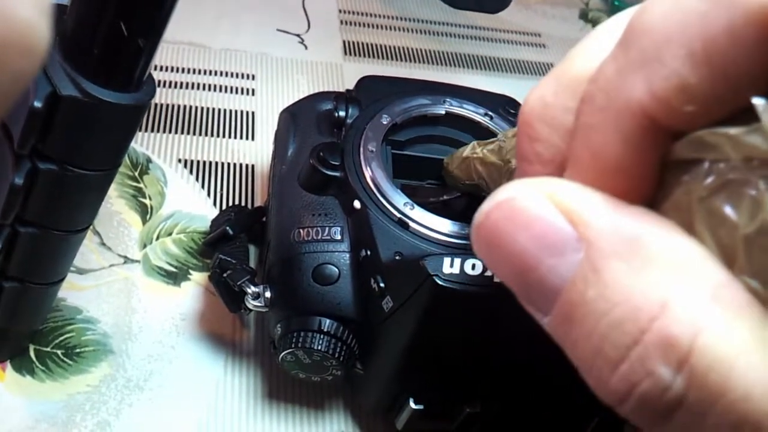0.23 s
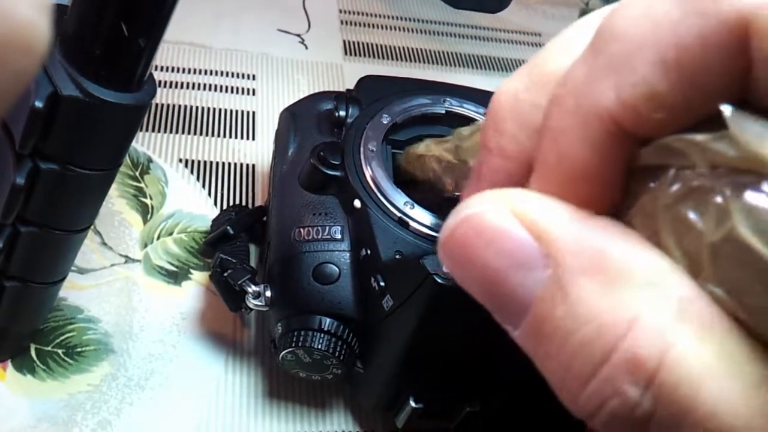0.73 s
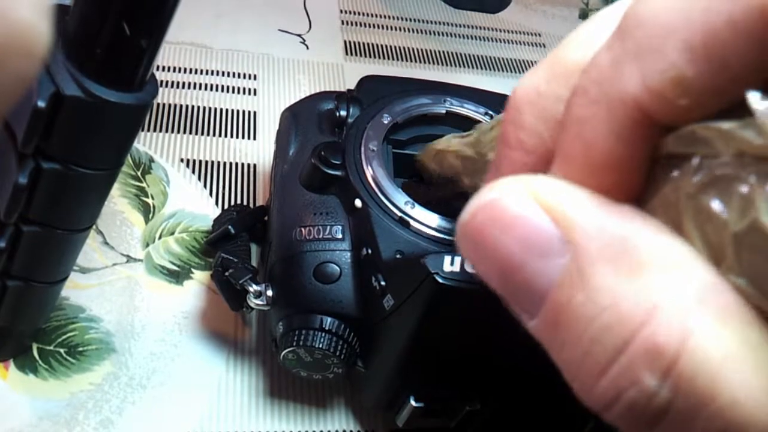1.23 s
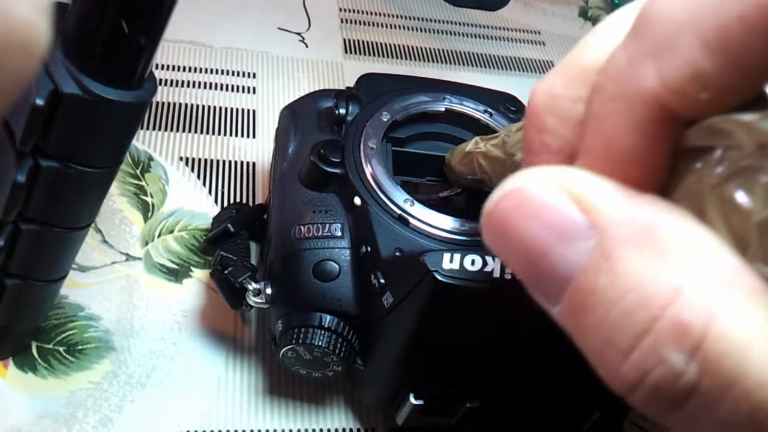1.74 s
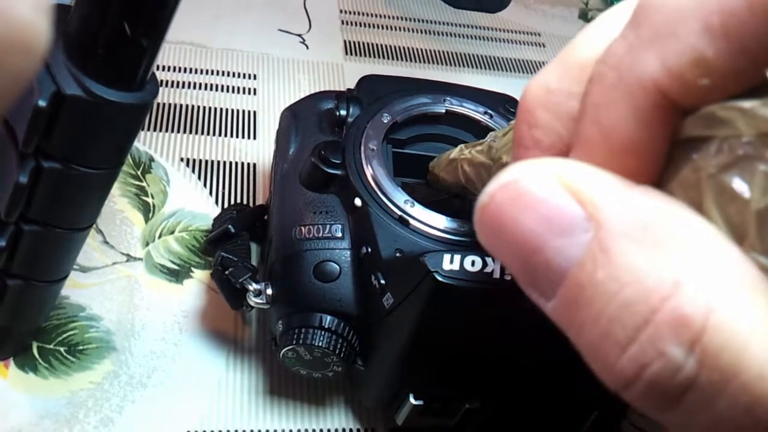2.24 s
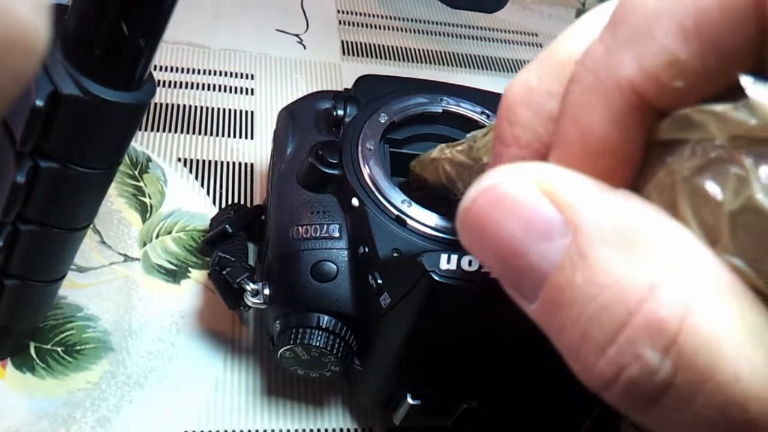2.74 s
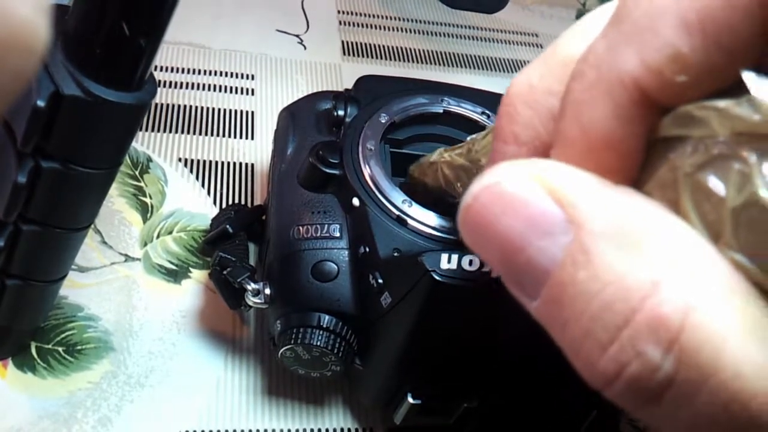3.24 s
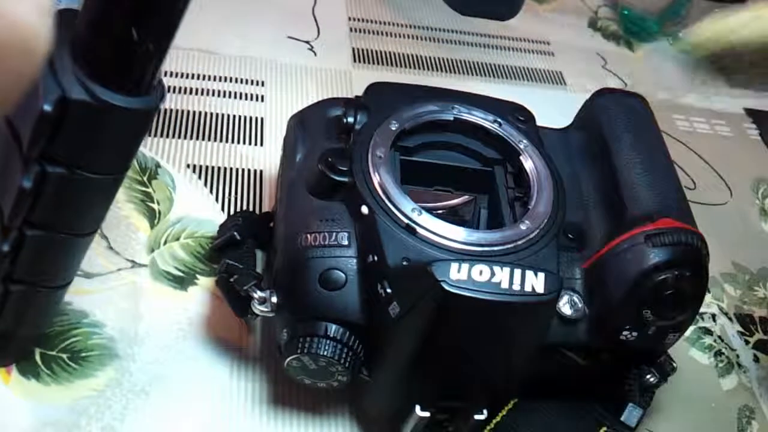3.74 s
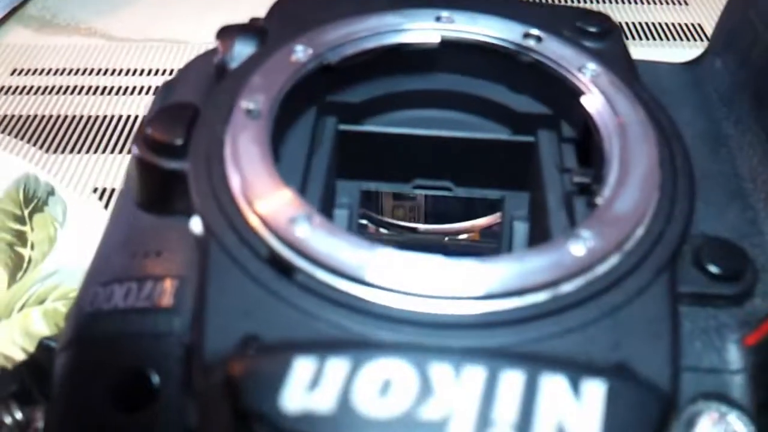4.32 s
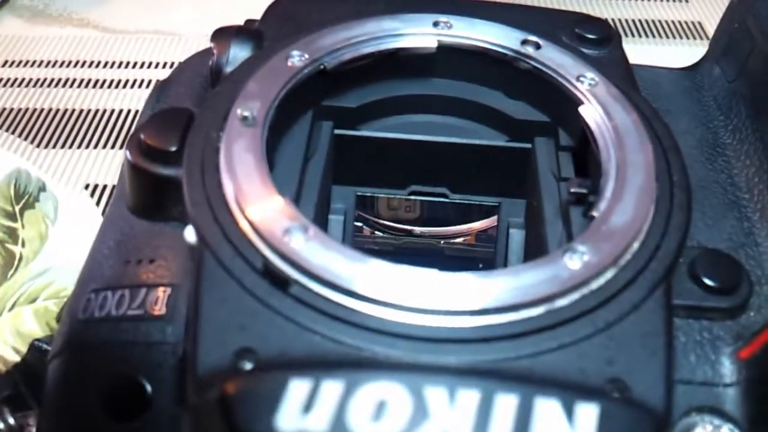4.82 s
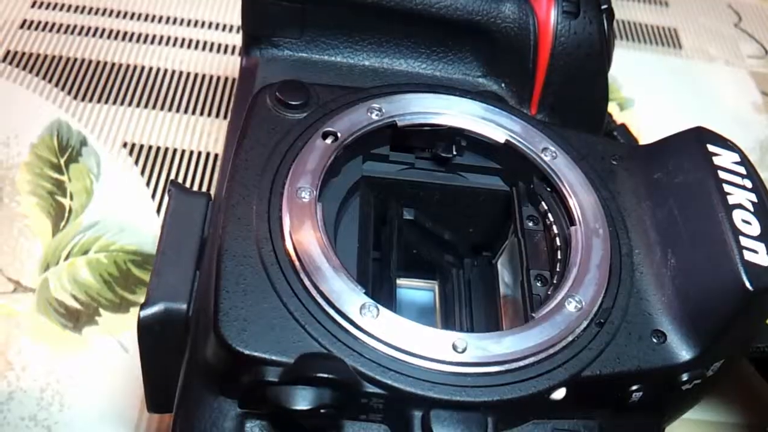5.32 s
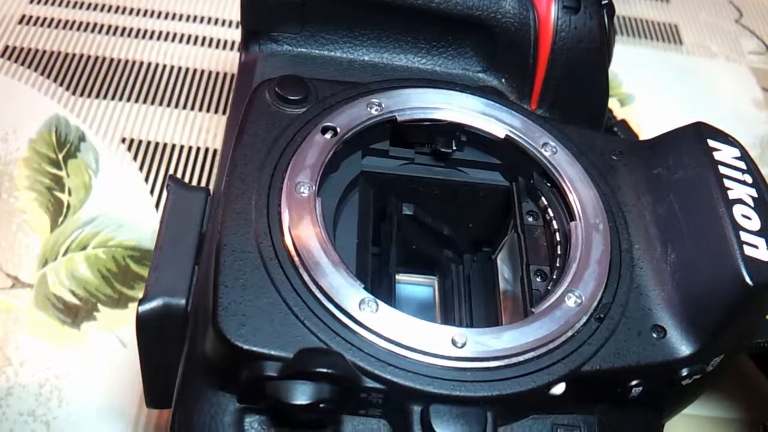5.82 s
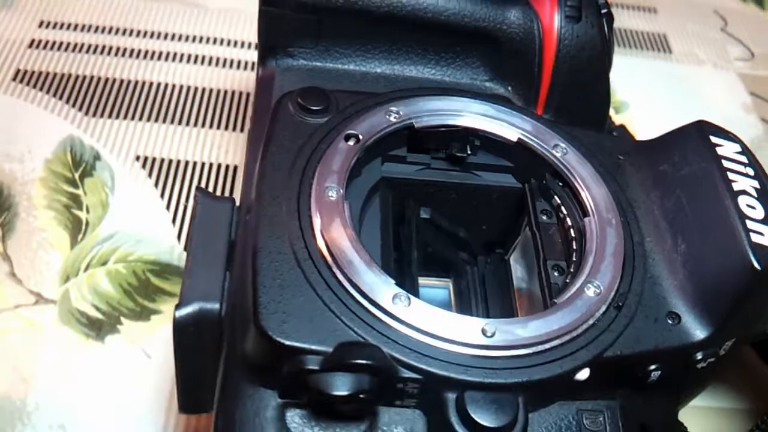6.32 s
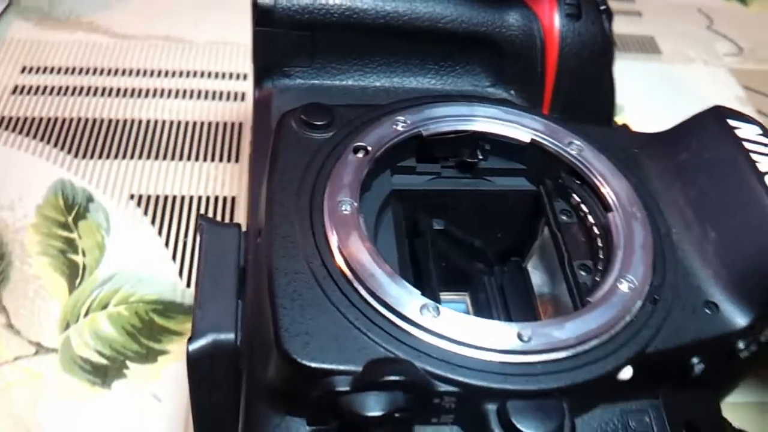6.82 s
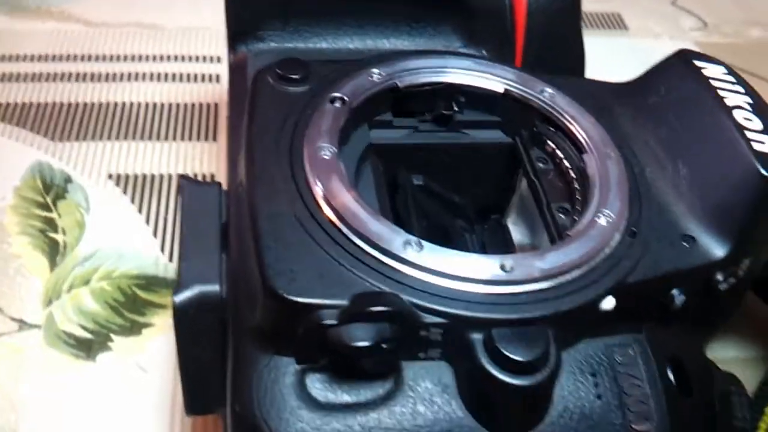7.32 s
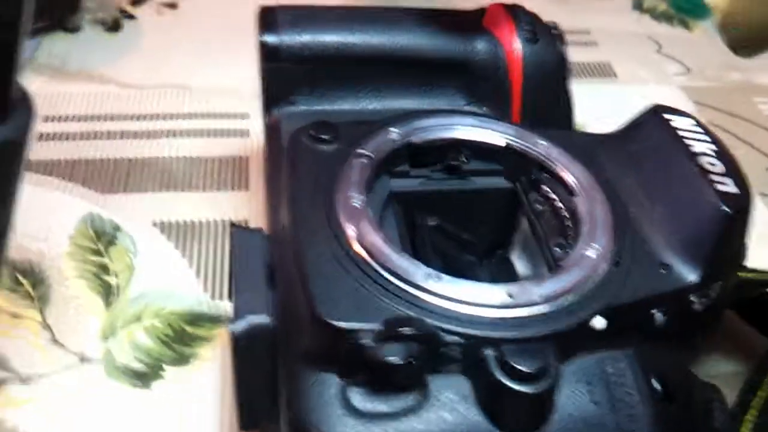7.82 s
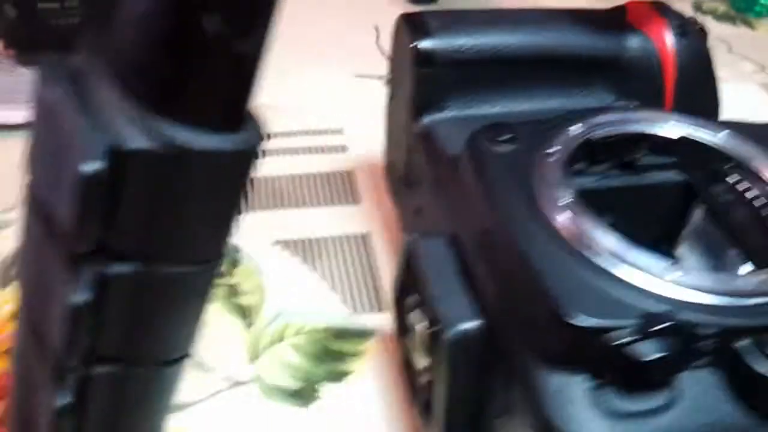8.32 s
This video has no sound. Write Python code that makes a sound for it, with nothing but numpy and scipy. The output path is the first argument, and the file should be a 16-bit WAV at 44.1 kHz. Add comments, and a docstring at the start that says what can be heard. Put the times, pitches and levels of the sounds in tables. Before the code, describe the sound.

Continuous vacuum suction in a small room, in three abrupt sections: first a quiet, restless hiss with whistly resonances and one soft low puff; then a loud, dense roar of air with a clearer motor hum and whine; finally a quieter hiss again, recoloured by short reflections around a moving microphone. Dull, flattened mono sound with limited treble, no pauses.

```python
"""A vacuum cleaner sucks dust from a camera body through a narrow taped nozzle; its motor hums throughout.
First the nozzle probes the lens mount: shaped noise hisses and the resonances of the cavity rise and fall. A
hard cut leads to an open rush, made of steadier noise through the nozzle's own resonances; the whole passage,
motor hum included, plays far louder. After a second hard cut the microphone wanders: moving resonances and
short echoes recolour the hiss. A mono 16 kHz recorder flattens the peaks and mirrors a little hiss above its
band."""
import sys
import numpy as np
from scipy import signal
from scipy.fft import rfft, irfft, next_fast_len
from scipy.io import wavfile
from scipy.ndimage import uniform_filter1d, map_coordinates

SR = 44100
rng = np.random.default_rng(int(sys.argv[2]) if len(sys.argv) > 2 else 0)


def generate_wav(sig):
    """Save sig (samples, or channels by samples) to the path in sys.argv[1] as 16-bit PCM at SR."""
    pcm = np.round(np.clip(np.atleast_2d(sig).T, -1, 1) * 32767).astype(np.int16)
    wavfile.write(sys.argv[1], SR, pcm)


N = 377937
TIME_S = np.arange(N) / SR
CUT_IN_S, CUT_OUT_S = 3.7903, 5.0812  # the open rush lies between these cuts


def amp(db):
    """Turn decibels into gain."""
    return 10 ** (np.asarray(db) / 20)


def unit(x):
    """Scale to rms 1."""
    return x / np.sqrt(np.mean(x ** 2) + 1e-20)


def along(points, hz):
    """Join (Hz, value) points with lines on a log frequency axis."""
    point_hz, value = np.transpose(points)
    return np.interp(np.log(hz + 1), np.log(point_hz + 1), value)


def curves(rows):
    """Give one value per sample for each column after the time in seconds."""
    seconds, *columns = np.transpose(rows)
    return [np.interp(TIME_S, seconds, column) for column in columns]


def wobble(rate):
    """A smooth random curve through rate random knots a second."""
    knots = rng.standard_normal(int(N * rate / SR) + 4)
    return map_coordinates(knots, [TIME_S * rate])


def filtered(x, response):
    """Multiply the spectrum of x by a response of frequency in Hz."""
    size = next_fast_len(N + SR // 2)
    spectrum = rfft(x, size) * response(np.fft.rfftfreq(size, 1 / SR))
    return irfft(spectrum, size)[:N]


def bell(f, hz, width):
    """A resonance curve, 1 at its centre and half as high half a width away."""
    return 1 / (1 + (2 * (f - hz) / width) ** 2)


def by_shot(first, second, third):
    """Cut from each shot to the next within a millisecond."""
    before, after = TIME_S < CUT_IN_S, TIME_S >= CUT_OUT_S
    shots = np.array([before, ~before & ~after, after], float)
    a, b, c = uniform_filter1d(shots, size=44, axis=1)
    return a * first + b * second + c * third


def turbulence(patchy_db):
    """White noise whose strength varies in random patches of time and frequency."""
    z = signal.stft(rng.standard_normal(N), nperseg=512)[2]
    patches = uniform_filter1d(rng.standard_normal(z.shape), size=5, axis=0)
    patches = uniform_filter1d(patches, size=22, axis=1)
    return signal.istft(z * amp(patchy_db * unit(patches)), nperseg=512)[1][:N]


def room(x, wet_db, t60=0.23):
    """Reflections from the walls, a decaying noise tail, ripple the spectrum of a steady sound."""
    t = np.arange(SR // 3) / SR
    tail = rng.standard_normal(len(t)) * amp(-60 * t / t60)
    return x + amp(wet_db) * signal.fftconvolve(x, tail / np.linalg.norm(tail))[:N]


def lift(levels, hiss_db, trim_db):
    """How far a mode with its own level curve stands above the broad hiss, in dB."""
    return curves(levels)[0] - hiss_db + trim_db


def jet(spectrum, modes, level_db, lifts_db, echoes, patchy_db):
    """Nozzle hiss: turbulence coloured by changing resonances and by echoes (ms, strength) close by."""
    f, frame_s, z = signal.stft(turbulence(patchy_db), SR, nperseg=512)
    f = f[:, None]

    def per_frame(control):
        return np.interp(frame_s, TIME_S, control * np.ones(N))

    db = along(spectrum, f) + per_frame(level_db)
    for (hz, width), lift_db in zip(modes, lifts_db):
        db = db + per_frame(lift_db) * bell(f, hz, width)
    # an echo adds and cancels in turn along the spectrum: a hollow, pipe-like colour
    comb = 1
    for delay_ms, strength in echoes:
        comb = comb + per_frame(strength) * np.exp(-2j * np.pi * f * per_frame(delay_ms) / 1000)
    return signal.istft(z * amp(db) * np.abs(comb), nperseg=512)[1][:N]


def air(spectrum, casing_share, patchy_db, wet_db):
    """The broad rush of air at rms 1: turbulence in a room, lifted where the casing resonates."""
    # Resonances of the casing. Each row: frequency in Hz, width in Hz, lift in dB at a casing share of 1.
    casing = [(96, 11, 10), (205.6, 22, 4.5), (580, 84, 5.5), (696, 126, 9.5), (1522, 21, 13),
              (2020, 25, 9.5)]

    def response(f):
        casing_db = sum(db * bell(f, hz, width) for hz, width, db in casing)
        return amp(along(spectrum, f) + casing_share * casing_db)

    return unit(filtered(room(turbulence(patchy_db), wet_db), response))


def draught(depth):
    """Air drawn past the microphone rumbles faintly, more so with depth, with one added puff."""
    mouth_db, grows_db = -67.5, 13  # level at the mouth of the mount, change at full depth
    puff_s, puff_db, puff_half_s = 1.93, -50, 0.06
    puff = np.exp(-((TIME_S - puff_s) / puff_half_s) ** 2)
    gain = amp(mouth_db + grows_db * depth) + amp(puff_db) * puff
    rumble = filtered(turbulence(patchy_db=4.5), lambda f: bell(f, 40, 170))
    return gain * unit(rumble)


def motor(shaft_hz, level_db, hum_db, whine_db, drift=0.00091, flutter_db=1.0):
    """The unbalanced shaft hums and the nine fan blades whine, both locked to the shaft speed."""
    # Tones of the shaft, then of the blades. Each row: multiple of the shaft speed, relative level in dB.
    shaft = [(1, -0.5), (3, -11.5)]
    blades = [(9, 0), (18, -15)]
    phase = 2 * np.pi * np.cumsum(shaft_hz * (1 + drift * wobble(16))) / SR

    def tones(orders):
        return sum(amp(db + flutter_db * wobble(10)) * np.sin(round(k) * phase) for k, db in orders)

    voices = amp(hum_db) * tones(shaft) + amp(whine_db) * tones(blades)
    return np.sqrt(2) * amp(level_db) * voices


def probing():
    """Deeper in the mount the flow chokes and the edge hiss sharpens, while two cavity modes come and go."""
    # How deep the nozzle sits in the mount. Each row: time in seconds, depth from 0 to 1.
    depth_points = [(0, 0.4), (.4, 0.27), (.51, 0.6), (.6, 0.54), (.87, 0.4), (.95, .86), (1.23, 0.97),
                    (1.33, .5), (1.73, 0.48), (1.83, .9), (1.92, 0.53), (2.74, 0.43), (3.0, 0.1),
                    (3.15, .2), (3.27, 0.67), (3.39, .22), (3.48, 0.47), (3.6, 0.17)]
    # Low cavity mode. Each row: time in seconds, level in dB before the trim.
    low_ring = [(0.0, -47), (0.39, -37.5), (0.56, -52), (0.58, -41.5), (1.26, -51), (1.3, -46.5),
                (2.12, -40.5), (3.43, -43), (3.6, -38), (3.77, -57.5)]
    # High cavity mode. Each row: time in seconds, level in dB on a scale that rests at ring_rest_db.
    high_ring = [(0.0, -34), (0.09, -33.5), (0.14, -42), (0.55, -44.5), (0.67, -41), (1.04, -43),
                 (1.21, -39), (1.22, -44), (1.29, -36.5), (1.55, -35.5), (1.63, -41.5), (2.71, -37),
                 (2.83, -44.5), (3.22, -40), (3.63, -42.5), (3.77, -36.5)]
    ring_rest_db = -47  # here the mode sinks into the hiss
    # Low cavity, high cavity and edge resonance. Each row: frequency in Hz, width in Hz.
    probe_modes = [(2460, 310), (3910, 1380), (6240, 4300)]
    # Colour of the hiss. Each row: frequency in Hz, relative level in dB per Hz.
    hiss_spectrum = [(300, -28), (900, -1), (1300, -9.5), (1600, 1.5), (2100, 2), (2400, 3), (3100, 1.3),
                     (4050, 0), (4600, -1), (5100, -2.5), (5700, -5.5), (6600, -4.5), (7400, -12),
                     (8000, -17)]
    # Colour of the air rush. Each row: frequency in Hz, relative level in dB per Hz.
    rush_spectrum = [(25, -4.5), (100, -2), (230, 3), (500, 1), (900, -2.5), (1400, 0.5), (3000, 0.5),
                     (5000, -20), (7000, -13), (8000, -29)]
    # Motor. Each row: time in seconds, shaft speed in Hz, level in dB before the hum and whine trims.
    motor_points = [(0.02, 401.8, -58), (0.15, 401.4, -49), (0.42, 402.0, -52), (0.91, 403.6, -49),
                    (0.93, 403.6, -60), (1.58, 400.2, -55), (1.62, 399.9, -50.5), (1.81, 400.6, -53),
                    (1.82, 401.0, -61), (2.15, 399.1, -48.5), (2.18, 398.1, -54.5), (2.92, 397.9, -49.5),
                    (3.75, 399.6, -50.5)]

    depth, = curves(depth_points)
    flow_db = -28 - 13 * depth  # depth chokes the flow
    pull_s, pull_takes_s, pull_db = 3.53, 0.071, -3.5  # the nozzle is pulled out and its edge hiss dulls
    pulled = np.clip((TIME_S - pull_s) / pull_takes_s, 0, 1)
    edge_db = -3.5 + 22.5 * depth + pull_db * pulled  # depth sharpens the edge
    low_db = lift(low_ring, flow_db, trim_db=15.5)
    high_db = curves(high_ring)[0] - ring_rest_db
    mount_echo = (0.76, 0.12)  # delay in ms, strength
    hiss = jet(hiss_spectrum, probe_modes, flow_db, [low_db, high_db, edge_db], [mount_echo], patchy_db=1.03)
    rush = amp(-43.5) * air(rush_spectrum, casing_share=0.44, patchy_db=1, wet_db=-8.5)
    hum = motor(*curves(motor_points), hum_db=0.4, whine_db=-10)
    return hiss + rush + draught(depth) + hum


def nozzle(modes, patchy_db):
    """Turbulence at the open tip excites each of its resonances."""
    out = np.zeros(N)
    for hz, width, db in modes:
        ringing = filtered(turbulence(patchy_db), lambda f: bell(f, hz, width) * f / (f + hz / 10))
        out += amp(db) * unit(ringing)
    return out


def open_rush():
    """The free nozzle rushes, the whole passage far louder: its pipe modes swell slowly, its edge modes hold."""
    # Resonances of the pipe, then of its edge. Each row: frequency in Hz, width in Hz, relative level in dB.
    pipe_modes = [(4320, 920, -2), (4800, 550, -4.5)]
    edge_modes = [(5700, 380, -2), (6080, 230, -8.5)]
    # Colour of the air rush. Each row: frequency in Hz, relative level in dB per Hz.
    rush_spectrum = [(25, -14), (140, -13), (230, -5), (300, -11.5), (480, -7), (620, -6.5), (750, -4.5),
                     (930, -9), (1350, -3.5), (1750, 0), (2250, -4), (2700, 0.5), (3500, -1), (6300, -7),
                     (7100, -6.5), (8000, -41)]

    pipe_db = -16 + 2 * (TIME_S - CUT_IN_S)  # swells by 2 dB a second
    pipe = amp(pipe_db) * nozzle(pipe_modes, patchy_db=0.4)
    edge = amp(-19) * nozzle(edge_modes, patchy_db=-0.5)
    rush = amp(-15.5) * air(rush_spectrum, casing_share=0.6, patchy_db=0.54, wet_db=-10)
    hum = motor(shaft_hz=393.1, level_db=-28, hum_db=1, whine_db=-2.2)
    return room(pipe + edge, wet_db=-17) + rush + hum


def wandering():
    """As the microphone moves, the hiss changes colour through three mode levels and two short echoes."""
    # Broad hiss as the microphone nears the tip and leaves it. Each row: time in seconds, level in dB.
    nearness = [(5.1, -34.5), (6.15, -34.5), (6.8, -31.5), (7.3, -28.5), (7.6, -27.5), (8.0, -29),
                (8.56, -32)]
    # Low, middle and top nozzle mode. Each row: time in seconds, level in dB before the trim.
    low = [(5.25, -42.5), (6.16, -41.5), (6.52, -49.5), (6.61, -46), (7.56, -51), (7.58, -45),
           (8.16, -44.5), (8.52, -41.5)]
    middle = [(5.15, -39), (6.5, -39), (6.76, -50), (7.0, -42), (7.06, -46), (7.44, -38), (7.8, -52),
              (8.46, -46.5), (8.5, -47)]
    treble = [(5.25, -49), (6.17, -49.5), (6.26, -43), (6.37, -52), (6.49, -41.5), (6.77, -45.5),
              (7.38, -46.5), (7.45, -60), (7.53, -49), (8.38, -40.5), (8.5, -41.5)]
    # Echoes from the table and the camera body.
    # Each row: time in seconds, delay of the far echo in ms, strength of the far echo, strength of the near one.
    echo_points = [(5.1, 1.15, .2, 0), (6.13, 1.147, 0.25, 0), (6.21, 0.73, .13, .25),
                   (6.47, 0.89, .08, 0.17), (6.62, 1.25, 0.2, 0.22), (6.9, 1.11, 0.22, .24),
                   (7.25, 1.12, 0.14, .04), (7.5, 1, 0.13, 0), (7.98, 0.87, 0.18, 0.084),
                   (8.15, .85, .03, 0.064), (8.56, 0.76, 0.11, .16)]
    # The three nozzle modes, low to top. Each row: frequency in Hz, width in Hz.
    wander_modes = [(2810, 1130), (4540, 1060), (6260, 580)]
    # Colour of the hiss. Each row: frequency in Hz, relative level in dB per Hz.
    hiss_spectrum = [(300, -21), (900, -12.5), (1300, -11), (1600, -4), (2300, 5.5), (3000, 3.6), (3450, 3),
                     (4000, 2), (5100, 2.5), (5700, 2.5), (6500, 1.5), (7400, -6.5), (8000, -15)]
    # Colour of the air rush. Each row: frequency in Hz, relative level in dB per Hz.
    rush_spectrum = [(25, 0.5), (100, -1.5), (230, 2), (500, -0.5), (900, 1), (1400, 3.5), (3000, -2.5),
                     (5000, -18), (7000, -21), (8000, -32)]
    # Motor. Each row: time in seconds, shaft speed in Hz, level in dB before the hum and whine trims.
    motor_points = [(5.15, 390.6, -54), (5.86, 390.8, -52.5), (6.02, 390, -54.5), (7.76, 392.9, -49.5),
                    (8.38, 394.5, -52.5), (8.55, 393, -48)]

    hiss_db, = curves(nearness)
    low_db = lift(low, hiss_db, trim_db=14)
    middle_db = lift(middle, hiss_db, trim_db=14)
    treble_db = lift(treble, hiss_db, trim_db=16.5)
    far_ms, far_echo, near_echo = curves(echo_points)
    echoes = [(far_ms, far_echo), (0.6 * far_ms, near_echo)]  # the near path is shorter
    hiss = jet(hiss_spectrum, wander_modes, hiss_db, [low_db, middle_db, treble_db], echoes, patchy_db=0.7)
    rush = amp(-44) * air(rush_spectrum, casing_share=0.49, patchy_db=0.6, wet_db=-9.5)
    hum = motor(*curves(motor_points), hum_db=-0.1, whine_db=-25)
    return room(hiss, wet_db=-16.5) + rush + hum


def scene():
    """Three shots in a row, alike in both channels."""
    mono = by_shot(probing(), open_rush(), wandering())
    return np.array([mono, mono])


def record(dry):
    """The recorder flattens peaks at a low sample rate, which mirrors the hiss above half that rate."""
    # The level at which peaks flatten, in dB, one value for each shot in turn.
    ceiling_db = (-26.5, -5.2, -25.6)
    recorder_hz, top_hz = 16000, 14600
    ceiling = amp(by_shot(*ceiling_db))
    samples = signal.resample_poly(dry[0] / ceiling, recorder_hz, SR)
    samples = samples / (1 + np.abs(samples) ** 8) ** (1 / 8)
    x = ceiling * signal.resample_poly(samples, SR, recorder_hz)[:N]
    # the band ends at half the recorder's rate, with a slight droop below it
    x = filtered(x, lambda f: (f < recorder_hz / 2) * amp(along([(7000, 0.057), (8000, -1.6)], f)))
    mirror = 2 * x * np.cos(2 * np.pi * recorder_hz * TIME_S)
    # straight lines between samples leave the mirror image weaker the higher it lies
    x = x + filtered(mirror, lambda f: (f > recorder_hz / 2) * np.abs(recorder_hz / (f + 1) - 1) ** 1.84)
    x = filtered(x, lambda f: f < top_hz)
    return np.array([x, x])


dry = scene()
out = record(dry)
generate_wav(out)
```